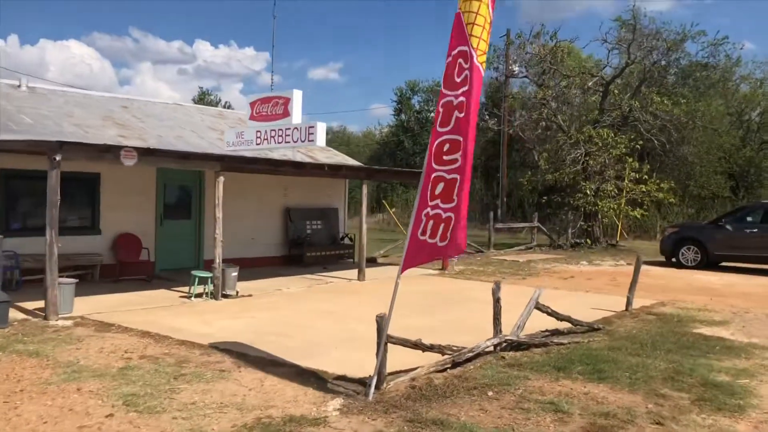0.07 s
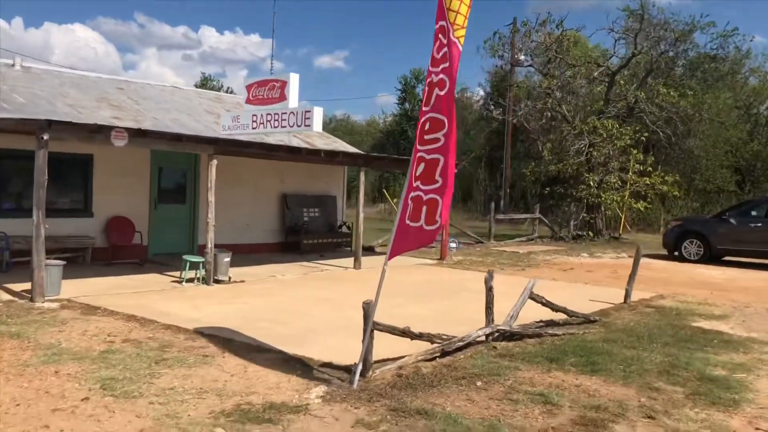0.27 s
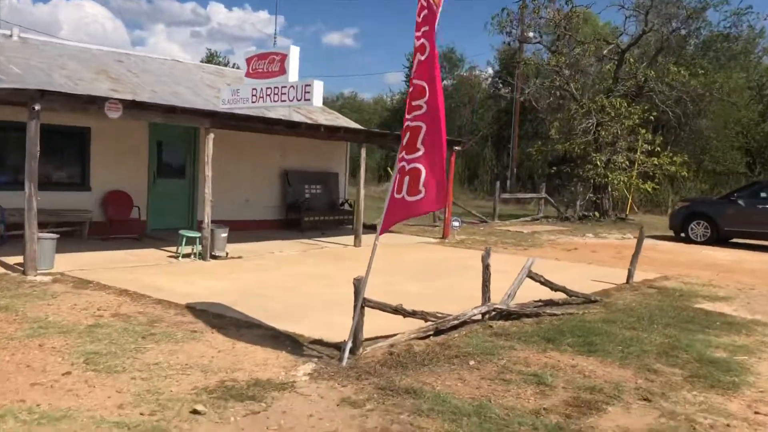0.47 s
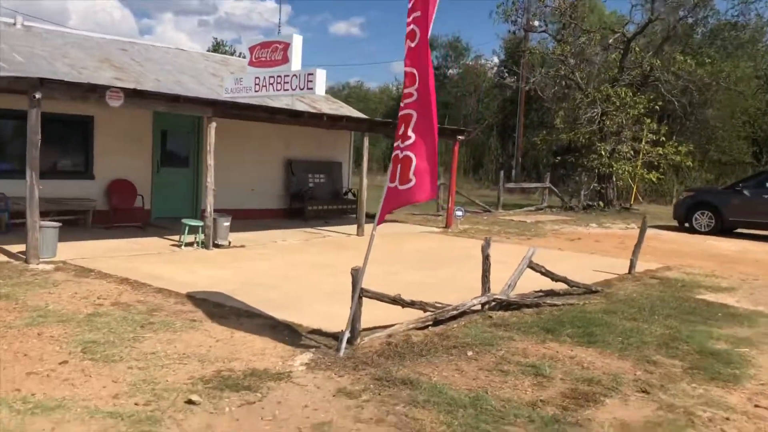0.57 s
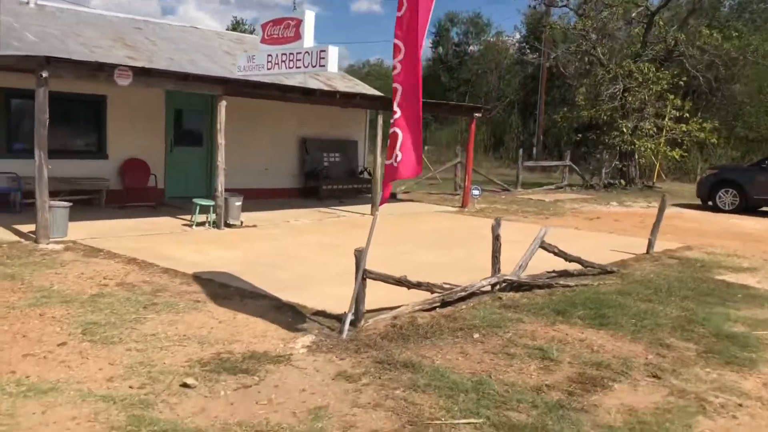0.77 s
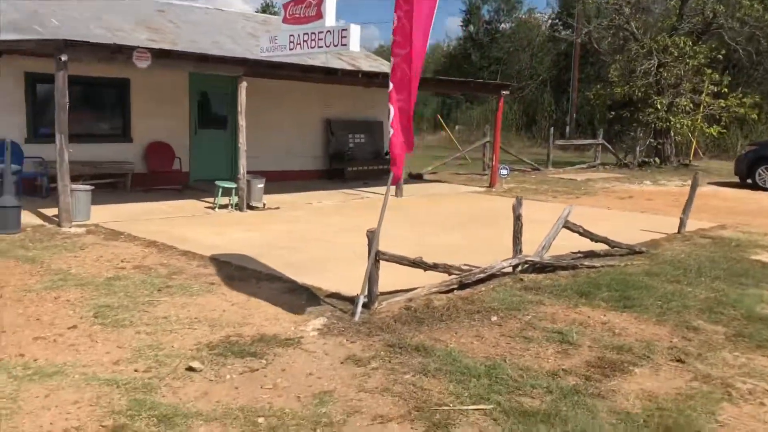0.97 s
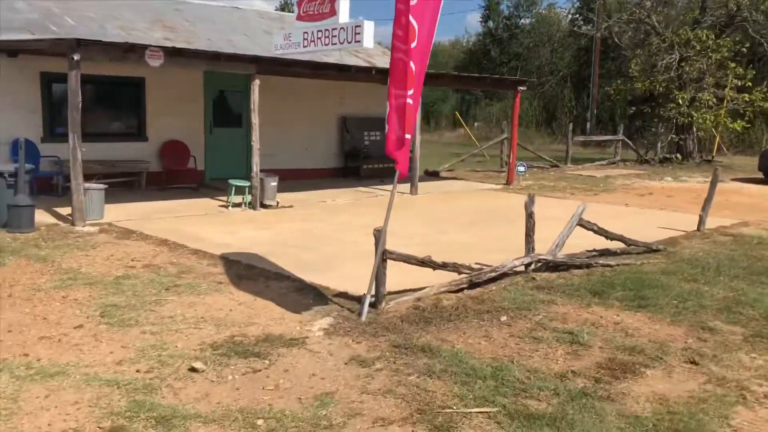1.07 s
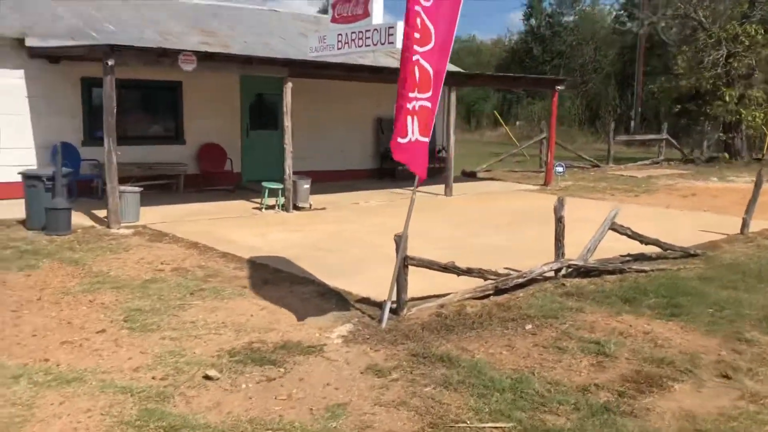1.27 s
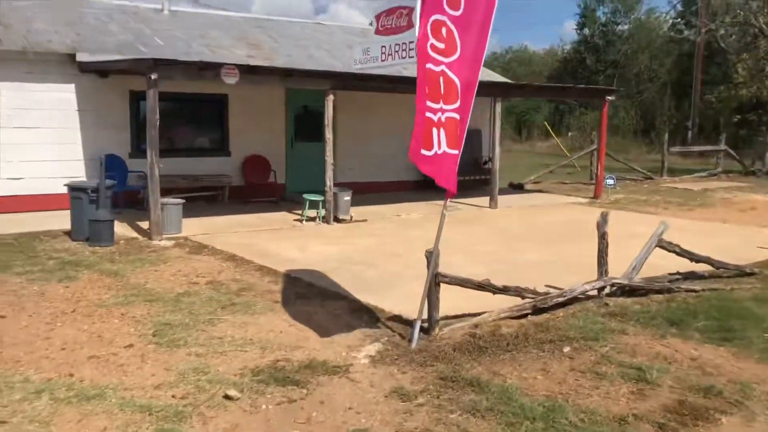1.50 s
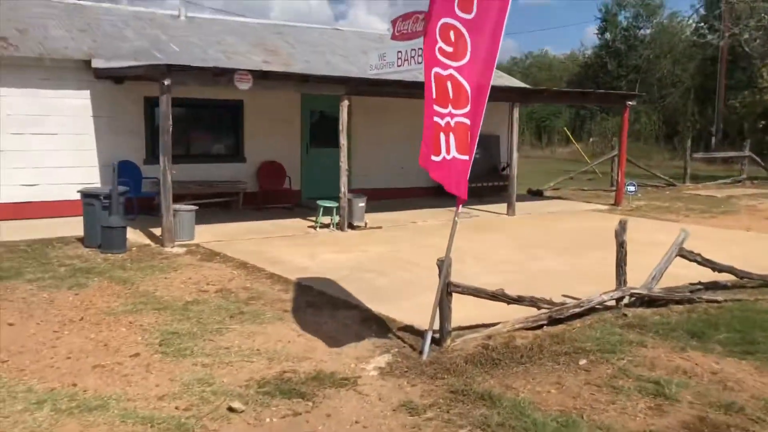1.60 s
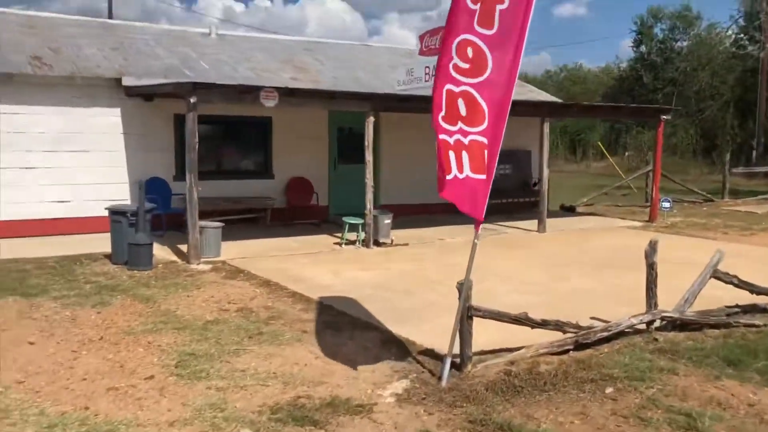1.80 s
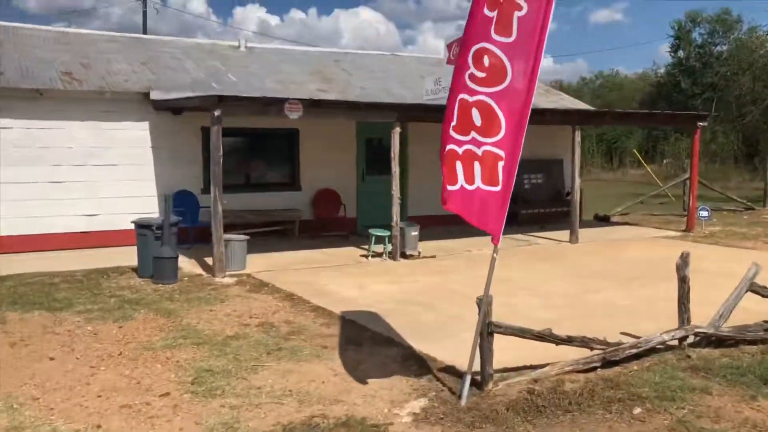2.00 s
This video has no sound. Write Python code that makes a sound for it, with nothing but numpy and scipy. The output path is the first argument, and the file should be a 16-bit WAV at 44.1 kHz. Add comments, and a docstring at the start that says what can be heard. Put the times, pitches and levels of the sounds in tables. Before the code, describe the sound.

Close footsteps on dry dirt and gravel: one crisp crunch at half a second, a heavier one near one second, then fainter grit settling, with low wind thumps on the microphone in an open, quiet place.

```python
"""On dry dirt and gravel in a light breeze, someone walks along near a microphone.
Each step grinds sand and stones: crowds of tiny ringing grains over smooth hiss, while single
stones knock and bits of grit tick as very short falling tones with a burst of noise.
Eddies of wind thump on the microphone as short falling tones over lumpy filtered noise.
Far traffic (shaped noise) and a thin hum (noise through one sharp resonance) lie behind."""
import sys
import numpy as np
from scipy import signal
from scipy.fft import rfft, irfft
from scipy.io import wavfile

SR = 44100
rng = np.random.default_rng(int(sys.argv[2]) if len(sys.argv) > 2 else 0)


def store_wav(level_fs):
    """Save 16-bit WAV to argv[1]."""
    pcm = np.round(np.clip(np.atleast_2d(level_fs), -1, 1) * 32767)
    wavfile.write(sys.argv[1], SR, pcm.T.astype(np.int16))


def volts(x):
    """Linear amplitude factor 10**(x/20) for a level x in dB, scalar or array-like."""
    e = np.asarray(x, float) / 20
    return 10 ** e


N = 90404   # length in samples

# how far traffic swells and fades: start_s, level_db
TRAFFIC_LEVEL = [(0.0, -54.5), (1.16, -55), (1.23, -60), (2.05, -58)]
# tone colour of traffic and open air: pitch_hz, density_db (per Hz)
AIR_SPECTRUM = [(120, 15), (200, -11), (347, -6.5), (519, -16), (696, -16), (763, 2), (821, -9.5), (933, 0),
                (1250, -15.5), (1450, -22), (2800, -38), (4200, -25.5), (7970, -30.5), (14900, -31),
                (16000, -32)]
# strength of the gusts: start_s, flutter_db, rumble_over_flutter_db (both before the trims in gusts)
GUST_LEVELS = [(0.0, -48, 5.5), (0.07, -63.5, -2), (0.45, -60, 11), (0.48, -76, 11), (0.5, -35, -34),
               (0.54, -58.5, 5.5), (0.85, -52, 4), (0.91, -21, -21), (0.93, -46.5, -1.5),
               (1.04, -33, -14.5), (1.08, -59, 4), (1.13, -29.5, -17), (1.25, -37.5, -5.5),
               (1.27, -62.5, 14.5), (1.31, -39, -3), (1.34, -62, -5), (1.45, -52.5, 6.5), (1.72, -60.5, -8),
               (1.74, -49, -16.5), (2.05, -73.5, 12)]
# low part of the wind: pitch_hz, density_db (per Hz)
RUMBLE_SPECTRUM = [(30, -5), (60, 6.5), (110, 3), (170, -11), (260, -7)]
# higher part of the wind: pitch_hz, density_db (per Hz)
FLUTTER_SPECTRUM = [(90, -61), (160, -4.5), (250, -11.5), (450, -5), (700, -21)]
# weight on the ground: start_s, grit_db, stones_over_grit_db (before the trim in crunch),
# gravel_over_grit_db, finest_sand_over_grit_db
FOOT_WEIGHT = [(0.0, -73, 17.5, 6, -8), (0.478, -81.5, 16, 10, -17), (0.482, -48, -5, 1.5, -15),
               (0.497, -45.5, -2, 0.5, -18), (0.507, -58, -2, 2.5, -6), (0.524, -46.5, -1, -1, -16),
               (0.533, -60.5, 10, 2, -4), (0.56, -57.5, 10.5, 4.5, -2), (0.61, -63.5, 10, 6.5, -5),
               (0.674, -70.5, 12, 3, -2), (0.68, -62, 7, 5, 5.5), (0.714, -78, 16, 4, 4),
               (0.721, -61, 1, 6.5, 3), (0.735, -75.5, 7.5, 3.5, -1), (0.945, -79.5, 11.5, -0.5, 5),
               (0.95, -59, 14.5, 0.5, -23), (0.968, -54, 11, -4, -12), (0.972, -41, -4, -26, -6.5),
               (1.005, -41.5, 9, -5, -3), (1.045, -45.5, 12, -10, -4.5), (1.068, -58, 17, -1, 3.5),
               (1.11, -68, 13.5, 1.0, 4.5), (1.165, -60.5, 11.5, 5.5, -1.5), (1.235, -62, 9.5, -3, -1),
               (1.31, -67, 4, -2.5, -1), (1.555, -76, 12, 10.5, 4), (1.56, -53.5, 7, 4, -6.5),
               (1.595, -72.5, 12.5, 6, 1), (1.685, -61, 9.5, 5.5, -5), (1.74, -53.5, 5, 6.5, -4),
               (1.79, -56.5, 16.5, 7.5, -7), (1.81, -63.5, 2, 7, -3), (1.88, -76, 13.5, 4.5, -3)]
# tone colour of each size of grain, coarse to fine: pitch_hz, density_db (per Hz)
STONE_SPECTRUM = [(250, -3.5), (450, -14), (800, 3), (1200, 1.5), (1600, -1.5), (2300, -12)]
GRAVEL_SPECTRUM = [(1900, 0), (2800, -1.5), (4000, -4)]
GRIT_SPECTRUM = [(3600, 0.5), (5600, 9), (7500, 1), (9000, -7.5)]
FINE_SAND_SPECTRUM = [(8000, -4), (10500, -8.5), (14000, -5.5), (16000, -4)]
# single bits of grit snap: peak_s, peak_db, pitch_hz
TICK_HITS = [(0.1207, -36.5, 11000), (0.1353, -45, 3950), (0.4925, -31, 3980), (0.4962, -28, 5100),
             (0.5252, -31.5, 6020), (0.6238, -39.5, 6140), (0.6711, -41, 3200), (0.6789, -34, 3915),
             (0.7171, -29.5, 5830), (0.7218, -41, 9100), (0.8815, -43, 11800), (0.9718, -37, 8800),
             (0.9753, -23, 6760), (1.0057, -22, 6010), (1.0405, -28.5, 7070), (1.1271, -41, 6900),
             (1.1444, -31, 13520), (1.1705, -32.5, 10500), (1.1992, -41, 4120), (1.22, -17.5, 5420),
             (1.2328, -27, 7910.0), (1.263, -35.5, 9700), (1.2763, -38, 4000), (1.2873, -39, 8960),
             (1.2951, -38, 6700), (1.337, -52, 7500), (1.3536, -37.5, 5300), (1.4319, -39.5, 3980),
             (1.5045, -40, 6800), (1.5669, -34.5, 5480), (1.5898, -36, 3550), (1.661, -41.5, 7540),
             (1.6881, -30.5, 5700), (1.7405, -29.5, 13400), (1.771, -35.5, 6600)]
# eddies pass the microphone: peak_s, peak_db, pitch_hz
EDDY_THUMPS = [(0.197, -35, 169.5), (0.29, -34, 205), (0.321, -34.5, 205), (0.361, -30.5, 204),
               (0.438, -26.5, 216.3), (0.457, -30, 174.2), (0.586, -34.5, 233), (0.663, -37.5, 161.6),
               (0.698, -33.5, 294), (0.76, -29.5, 215.5), (0.803, -28.5, 190.0), (0.818, -27, 185.8),
               (0.835, -36.5, 150.6), (0.863, -26.5, 248.3), (0.893, -26.5, 433), (0.913, -28.5, 266.2),
               (0.964, -34.5, 288), (1.109, -37, 279), (1.14, -19.0, 345.6), (1.153, -25.5, 318),
               (1.186, -19, 288.8), (1.199, -25, 203.7), (1.227, -29, 200.5), (1.242, -23, 311.4),
               (1.279, -33, 180), (1.302, -25.5, 244.7), (1.4, -37, 221.6), (1.418, -33, 197.4),
               (1.439, -36, 210.4), (1.457, -35, 185.2), (1.471, -30, 202), (1.51, -35, 231),
               (1.8, -47, 198.5), (1.988, -44, 191)]
# larger stones knock: peak_s, peak_db, pitch_hz
KNOCK_HITS = [(0.4927, -30.5, 1310), (0.4996, -26, 1260), (0.502, -27.5, 608), (0.5226, -31.5, 851),
              (0.5483, -32.5, 1580), (0.6245, -31.5, 1450), (0.6715, -34.5, 1710), (0.9564, -30, 1380.0),
              (1.0034, -20.5, 1110), (1.0395, -27, 1000), (1.0518, -24, 1200), (1.0635, -30, 1290),
              (1.1429, -26, 1350), (1.1983, -27, 1520), (1.2203, -33, 1800), (1.277, -40, 1500.0),
              (1.3755, -40.5, 1300.0), (1.509, -37.5, 1250.0), (1.579, -35.5, 2200), (1.6052, -29, 1530),
              (1.608, -31, 559.5), (1.639, -37, 2353), (1.687, -35.5, 726), (1.6883, -28.5, 1752),
              (1.7737, -32, 1530), (1.788, -37, 607), (1.9345, -40.5, 1650.0)]

GRIT_SPREAD_DB, STONE_SPREAD_DB = 3.5, 2.3   # how uneven the grains are
SAND_HISS_DB, DIRT_HISS_DB = -11, -11   # smooth hiss of sand and of loose dirt


def rms_one(x):
    """Scale to an average (rms) level of 1."""
    return x / np.sqrt(np.mean(x ** 2) + 1e-20)


def in_time(rows):
    """Turn table columns into smooth curves in time."""
    seconds, *columns = np.transpose(rows)
    return [np.interp(np.arange(N) / SR, seconds, column) for column in columns]


def at_hz(spectrum, hz):
    """Read a spectrum table, with straight lines over log pitch."""
    table_hz, table_db = np.transpose(spectrum)
    return np.interp(np.log(hz), np.log(table_hz), table_db)


def coloured(spectrum):
    """Noise with the given spectrum, falling 31 dB per octave outside it; rms 1."""
    hz = np.arange(1, N // 2 + 2) * SR / N
    octaves_below = np.maximum(0, np.log2(spectrum[0][0] / hz))
    octaves_above = np.maximum(0, np.log2(hz / spectrum[-1][0]))
    gain = volts(at_hz(spectrum, hz) - 31 * (octaves_below + octaves_above))
    return rms_one(irfft(rfft(rng.standard_normal(N)) * gain, N))


def drift(corner_hz):
    """Slow random wandering: noise smoothed twice; rms 1."""
    r = np.exp(-2 * np.pi * corner_hz / SR)
    noise = rng.standard_normal(N + SR)
    return rms_one(signal.lfilter([1], [1, -2 * r, r * r], noise)[SR:])   # drop the first second


def ring(clicks, hz, cycles):
    """A resonance: each click rings at hz and dies by 60 dB in so many cycles."""
    r = volts(-60 * hz / (cycles * SR))
    w = 2 * np.pi * hz / SR
    return signal.lfilter([0, np.sin(w)], [1, -2 * r * np.cos(w), r * r], clicks + 1e-18)


def grains(per_s, spectrum, spread_db, cycles, count=16):
    """Random uneven cracks dealt to resonances across the spectrum, each swelling softly; rms 1."""
    sizes = volts(spread_db * np.minimum(rng.exponential(1, N), 3)) * rng.choice([-1, 1], N)
    cracks = sizes * (rng.random(N) < per_s / SR)
    dealt = rng.integers(0, count, N)
    out = np.zeros(N)
    for k, hz in enumerate(np.geomspace(spectrum[0][0], min(spectrum[-1][0], 15500), count)):
        once = ring(cracks * (dealt == k), hz, cycles)
        twice = ring(once, hz, cycles)   # the second pass softens the start
        # higher resonances cover a wider band, hence the square root
        out += volts(at_hz(spectrum, hz)) * np.sqrt(hz) * rms_one(twice)
    return rms_one(out)


def swings(rows, rise, fall, sag):
    """Short tones that swell and die (rise, fall in cycles) as pitch sags (share per cycle)."""
    out = np.zeros(N + 6000)
    t = np.arange(-1500, 4500) / SR   # 0 at the peak
    for (s, db, hz), turn in zip(rows, rng.random(len(rows))):
        c = hz * t   # cycles from the peak
        shape = np.where(c < 0, np.exp(-(c / rise) ** 2), np.exp(-np.abs(c) / fall))
        pitch_hz = hz * np.where(c < 0, 1 - sag * np.maximum(c, -2), 1 / (1 + sag * np.abs(c)))
        tone = np.sin(2 * np.pi * (np.cumsum(pitch_hz) / SR + turn))
        i = int(s * SR)
        out[i:i + 6000] += volts(db) * shape * tone
    return out[1500:N + 1500]


def splash(rows, over_db, fall_s):
    """A dying burst of broad noise at each hit, from half its pitch to some way above it."""
    fade = np.exp(-np.arange(400) / (fall_s * SR))
    out = np.zeros(N + len(fade))
    for s, db, hz in rows:
        burst = rng.standard_normal(len(fade)) * fade
        band = signal.butter(2, [hz / 2, min(3.2 * hz, 18000)], "band", fs=SR, output="sos")
        i = int(s * SR)
        out[i:i + len(fade)] += volts(db + over_db) * signal.sosfilt(band, burst)
    return out[:N]


def far_traffic():
    """Far traffic and open air: shaped noise that swells and fades."""
    level_db, = in_time(TRAFFIC_LEVEL)
    return volts(level_db) * coloured(AIR_SPECTRUM)


def hum():
    """A thin wavering hum: noise keeps stirring one sharp resonance."""
    hz, die_s, level_db = 775, 0.86, -68.5   # die_s: time to fall by 60 dB
    return volts(level_db) * rms_one(ring(rng.standard_normal(N), hz, hz * die_s))


def gusts():
    """Wind on the microphone: lumpy flutter and lower rumble follow the gusts."""
    rumble_trim_db, flutter_trim_db = 4, -5
    lump_db, lump_hz = 3, 58   # spread and pace of the lumps
    flutter_db, rumble_db = in_time(GUST_LEVELS)
    rumble_gain = volts(rumble_trim_db + rumble_db + lump_db * drift(lump_hz))
    flutter_gain = volts(flutter_trim_db + lump_db * drift(lump_hz))
    rumble = rumble_gain * coloured(RUMBLE_SPECTRUM)
    flutter = flutter_gain * coloured(FLUTTER_SPECTRUM)
    return volts(flutter_db) * (rumble + flutter)


def crunch():
    """Grit, sand, gravel and stones grind in clumps under the weight of the foot."""
    stone_trim_db = -2
    clump_db, clump_hz = 2.3, 90   # spread and pace of the clumps
    grit_db, stone_db, gravel_db, fine_db = in_time(FOOT_WEIGHT)
    grit = grains(2600, GRIT_SPECTRUM, GRIT_SPREAD_DB, cycles=8.2, count=8)
    grit += volts(SAND_HISS_DB) * coloured(GRIT_SPECTRUM)
    fine = grains(2600, FINE_SAND_SPECTRUM, GRIT_SPREAD_DB, cycles=8.2, count=6)
    fine += volts(SAND_HISS_DB) * coloured(FINE_SAND_SPECTRUM)
    gravel = grains(2500, GRAVEL_SPECTRUM, GRIT_SPREAD_DB, cycles=6.3, count=8)
    gravel += volts(SAND_HISS_DB) * coloured(GRAVEL_SPECTRUM)
    stones = volts(stone_trim_db) * grains(1500, STONE_SPECTRUM, STONE_SPREAD_DB, cycles=6.0)
    stones += volts(DIRT_HISS_DB) * coloured(STONE_SPECTRUM)
    mix = grit + volts(stone_db) * stones + volts(gravel_db) * gravel + volts(fine_db) * fine
    return volts(grit_db + clump_db * drift(clump_hz)) * mix


def stray_bits():
    """Stray bits roll and settle: sparse, faint grains all the way through."""
    return volts(-74) * grains(60, GRAVEL_SPECTRUM, STONE_SPREAD_DB, cycles=3.0, count=6)


def ticks():
    """Single bits of grit snap: a cycle or two of high tone with a tiny burst of noise."""
    tones = swings(TICK_HITS, rise=0.69, fall=0.99, sag=0.075)
    return tones + splash(TICK_HITS, over_db=-11, fall_s=0.00031)


def eddies():
    """Single eddies of wind thump on the microphone: short low tones that fall in pitch."""
    return swings(EDDY_THUMPS, rise=0.28, fall=1.58, sag=0.2204)


def knocks():
    """Larger stones knock: a cycle or two of lower tone with a short burst of noise."""
    tones = swings(KNOCK_HITS, rise=0.76, fall=0.73, sag=0.15)
    return tones + splash(KNOCK_HITS, over_db=-5, fall_s=0.0008)


def scene():
    """Background, wind and steps together, as one channel."""
    background = far_traffic() + hum()
    wind = gusts() + eddies()
    steps = crunch() + stray_bits() + ticks() + knocks()
    return (background + wind + steps)[None]


def band_limit(x):
    """A steep low-pass at the top of the band."""
    return signal.sosfilt(signal.butter(12, 16660, fs=SR, output="sos"), x)


def record(dry):
    """The microphone drops the deepest bass, then a steep filter cuts the top."""
    bass_cut = signal.butter(2, 42, "high", fs=SR, output="sos")
    top_cut = signal.cheby2(12, 40, 16200, fs=SR, output="sos")   # 40 dB down from 16200 Hz up
    mix = signal.sosfilt(top_cut, signal.sosfilt(bass_cut, dry))
    return band_limit(mix)


dry = scene()
out = record(dry)
store_wav(out)
```